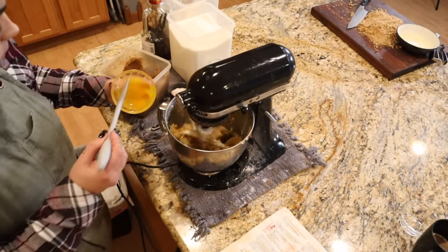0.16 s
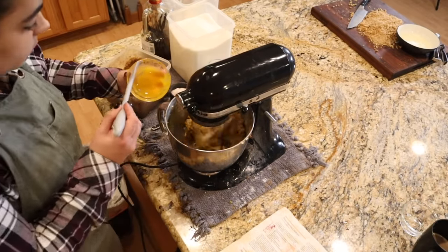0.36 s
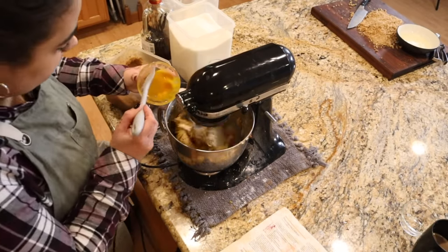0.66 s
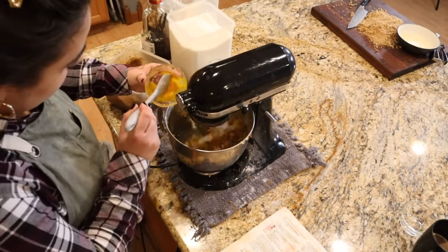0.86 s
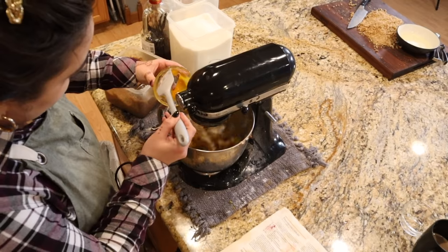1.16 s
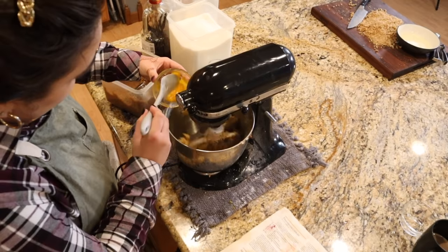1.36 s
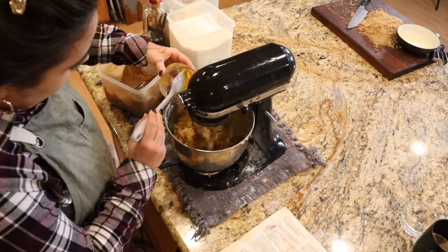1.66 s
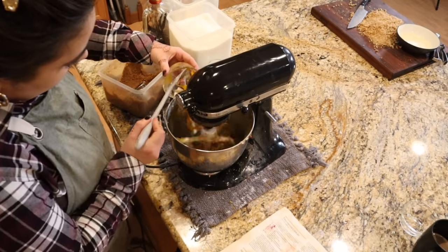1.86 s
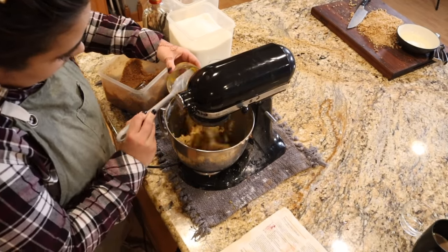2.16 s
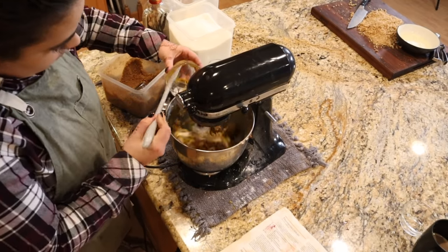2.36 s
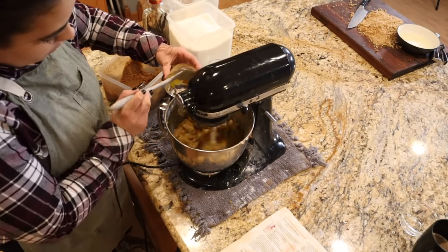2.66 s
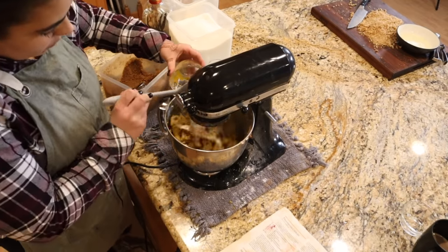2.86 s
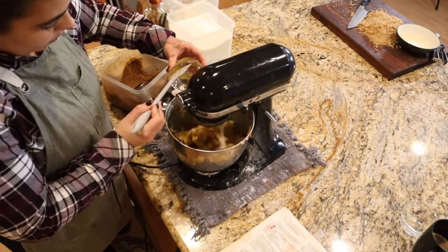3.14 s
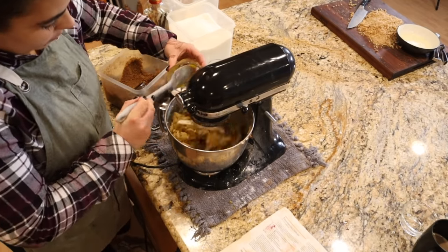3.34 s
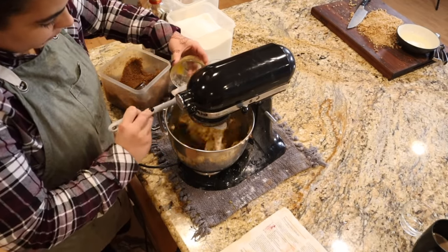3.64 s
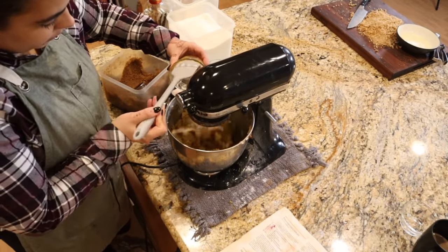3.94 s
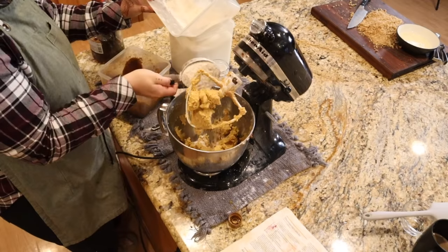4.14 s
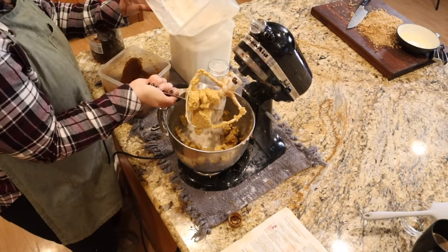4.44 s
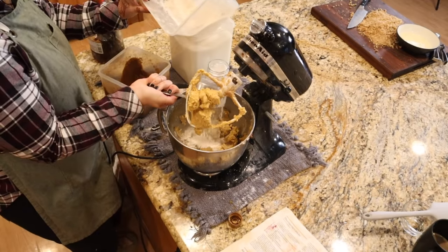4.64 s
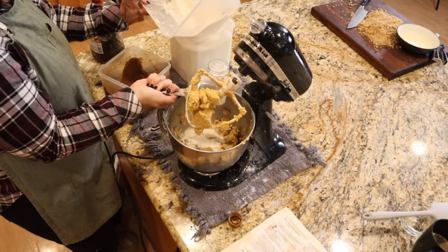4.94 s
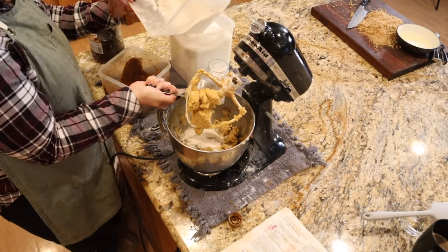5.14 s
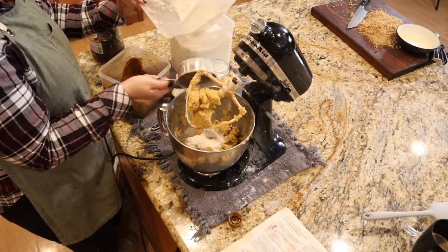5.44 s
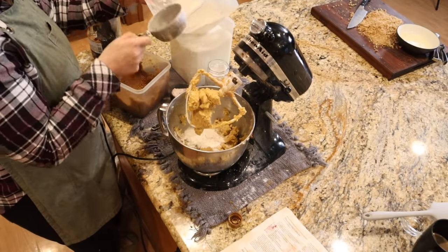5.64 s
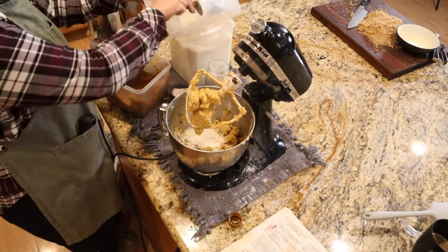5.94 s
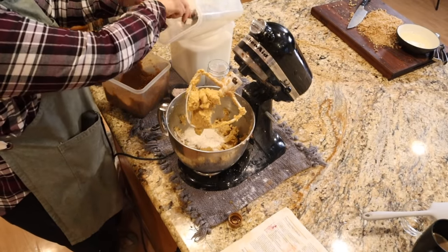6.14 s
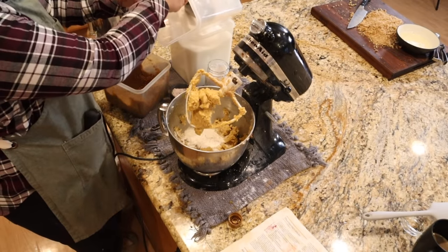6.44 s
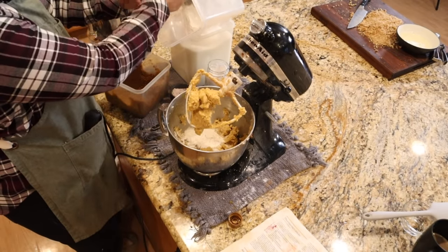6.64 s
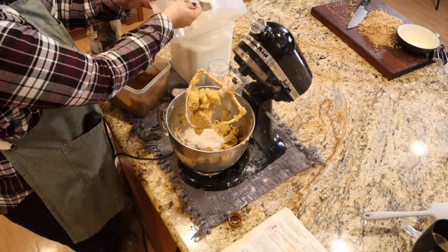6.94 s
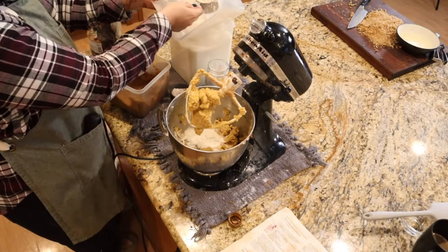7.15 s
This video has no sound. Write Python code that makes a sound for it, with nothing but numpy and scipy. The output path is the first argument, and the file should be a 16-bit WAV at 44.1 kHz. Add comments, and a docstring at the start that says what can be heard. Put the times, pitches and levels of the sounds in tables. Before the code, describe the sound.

Heard from close by, an electric kitchen mixer beats dough with a steady high whine, a hiss and faint gear ticks, joined by occasional utensil clacks on its metal bowl. After about four seconds the motor sound breaks off, leaving faint room hiss. Soft scooping follows, with dull bumps of a plastic tub, a few louder knocks from a metal measuring cup and some light clinks, each with a short room echo.

```python
"""Stand mixer and measuring cup

A stand mixer beats dough on a kitchen counter: its commutator whines at a pitch that sags under load,
the gears churn and tick, and a spatula and dish excite the modes of the steel bowl. The mixer's sound
breaks off. In the quiet room a metal measuring cup serves as a scoop: it clinks, knocks on plastic
rims and bumps the flour tub. Each impact rings object and room; soft rubs and thuds come in between."""
import sys
import numpy as np
from scipy import signal
from scipy.fft import rfft, irfft
from scipy.io import wavfile
from scipy.ndimage import uniform_filter1d

SR = 44100
rng = np.random.default_rng(int(sys.argv[2]) if len(sys.argv) > 2 else 0)


def unload_wav(signal):
    """Save mono or channel-first audio to the path in sys.argv[1] as 16-bit WAV at rate SR, clipped to [-1, 1]."""
    wavfile.write(
        sys.argv[1],
        SR,
        np.round(np.clip(np.atleast_2d(signal).T, -1, 1) * 32767).astype(np.int16),
    )


N = 321930
TIME = np.arange(N) / SR
RING = np.arange(int(.7 * SR)) / SR  # time axis of one short event [s]
MIXER_END_S = 4.168
COMMUTATOR_BARS, RIPPLE_HZ = 16, 120
HOUSING_HZ, HOUSING_WIDTH_HZ = 1859, 38  # resonance of the motor housing
PORT_LAG_SAMPLES = 2

# motor shaft, held back unevenly by the dough: (time [s], speed [Hz])
SHAFT_SPEED = [(0.0, 116.9), (0.15, 117.8), (0.29, 115.6), (0.54, 118.1), (0.75, 116.0), (0.88, 116.7),
               (0.93, 115.1), (1.02, 116.2), (1.07, 118.3), (1.14, 118.2), (1.21, 116.2), (1.25, 117.5),
               (1.36, 115), (1.45, 117.9), (1.56, 116.6), (1.64, 117), (1.79, 115.7), (1.91, 117.5),
               (1.94, 114.5), (2.0, 117), (2.12, 116.4), (2.23, 118.1), (2.29, 116.6), (2.34, 118.1),
               (2.4, 116.3), (2.53, 116.9), (2.58, 117.9), (2.72, 117), (2.86, 117.1), (2.97, 114.9),
               (3.13, 118), (3.24, 115.9), (3.34, 118.1), (3.53, 115.5), (3.65, 116.9), (3.82, 116.1),
               (3.87, 117.6), (3.95, 116.1), (4.04, 117.2), (4.15, 115.4)]
# envelope of the whine, which dips briefly once: (time [s], level [dB])
WHINE_LEVEL = [(0, -42), (1.06, -45.5), (1.11, -47), (1.16, -45), (4.15, -46)]
# whine partials: (offset [shaft orders], offset [ripple orders], level [dB], gain with sag [dB/Hz])
WHINE_PARTIALS = [(0, -2, -22.5, -4), (0, -1, -18.5, -5), (0, 0, -1.5, -1), (0, 1, -11.5, 6),
                  (1, 0, -20.5, -3), (0, 2, -16.5, 2)]
# hum of the gear train: (frequency at the usual shaft speed [Hz], level [dB])
GEAR_TONES = [(435, -63), (505, -66), (655, -64.5), (768, -63.5), (848, -61)]
# clicks of the gear case, on a beat of about twenty shaft turns: (time [s], level [dB])
GEAR_TICKS = [(0.2324, -50.5), (0.571, -47.5), (0.743, -48.5), (0.913, -50.5), (1.256, -50), (1.768, -49.5),
              (2.1115, -52.5), (2.280, -48), (2.449, -50.5), (2.790, -49), (2.962, -49.5), (3.474, -49.5),
              (3.645, -46.5), (3.987, -49)]
# spectra of gear churn, brushes with cooling air, and a tick: (frequency [Hz], relative level [dB])
CHURN_SPECTRUM = [(30, -56), (65, -7), (100, -13.5), (130, -13.5), (200, -23.5), (248, -3), (290, -17),
                  (385, -9), (455, -5.5), (600, -11.5), (670, -2), (850, -8.5), (915, -10.5), (1060, -5.5),
                  (1400, -15), (2000, -4.5), (3200, -100)]
BRUSH_SPECTRUM = [(1000, -4), (2200, 7), (2650, 4), (3100, 3), (4800, 7.5), (5600, 7), (6600, 12),
                  (7800, 5), (8700, 6.5), (10000, 0), (12000, -3), (15500, -19)]
TICK_SPECTRUM = [(1200, -17.5), (3000, -10), (5000, -1), (8500, -10.5), (12000, -18), (16000, -44)]

# impacts: (time [s], thump [dB], knock [dB], click [dB], frequency the struck spot favours [Hz],
# gain of that added band [dB], free ring relative to the rattle [dB])
BOWL_CLACKS = [(0.301, -49, -50, -45, 484, 5, -22), (1.6267, -66, -40, -39.5, 4540, -4, -3),
               (1.9357, -49.5, -35.5, -31, 5360, -1, -4), (1.949, -51, -35, -44, 1000, 7, -3),
               (2.3616, -55.5, -41, -56, 940, 12, -14), (2.6284, -54, -36, -41.5, 980, 12, 2),
               (3.5374, -52, -33.5, -35, 2170, 6, -6), (3.549, -66, -35.5, -42, 1020, 9, 11)]  # clacks of spatula and dish on the bowl, two followed by a quick echo
SCOOP_BLOWS = [(5.1593, -54.5, -47.5, -56.5, 1340, -11, -16), (5.316, -34.5, -37, -41.5, 760, 10, -14),
               (6.0301, -20, -18.5, -35, 1010, -1, -11), (6.0625, -24.5, -25.5, -29.5, 955, -1, -21),
               (6.0645, -44, -30, -34.5, 6950, -18, -22), (6.1915, -29, -34.5, -44.5, 1000, 0, -4)]  # scoop on plastic rims
TUB_BLOWS = [(4.7037, -64, -52, -64, 484, 4, -10), (4.8229, -67, -51, -60, 500, 3, 3),
             (5.3505, -37.5, -42.5, -56, 232, 11, -5), (5.409, -32, -40, -64, 346, 6, -0.5),
             (5.555, -38.5, -38, -57.5, 760, 2, -7), (6.2288, -15.5, -31.5, -41.5, 151, -6, 1.5),
             (6.5923, -43.5, -56, -56, 186, 22, -7), (6.7165, -36.5, -55, -53, 170, 32, -2.5),
             (6.9395, -44, -56, -73, 380, -10, 10), (7.1708, -32.5, -46, -87, 328, 8, 4)]  # tub on the counter
CUP_BLOWS = [(6.4681, -56, -64, -53.5, 4370, -3, -23), (6.4772, -52, -53, -54, 4430, 9, -20),
             (6.5251, -59, -40, -35.5, 3840, 9, -10), (6.5702, -45, -44, -52, 1320, -11, -25),
             (6.8, -51.5, -57, -56, 1310, 12, -8), (6.8574, -62, -51, -51, 1300, -2, -13),
             (6.8708, -50, -33, -52, 1220, 3, -11)]  # clinks of the measuring cup
# normal modes of each object: (frequency [Hz], relative level [dB], t60 [s])
BOWL_MODES = [(350, -20, 0.17), (996, -1, 0.17), (1074, -1, 0.11), (1417, -6, 0.14), (1742, -7, 0.25),
              (2036, 1, 0.044), (2593, -5, 0.084), (3370, -8, 0.18), (4750, 1.5, 0.13), (4870, -4, 0.15),
              (5290, 3, 0.06)]
SCOOP_MODES = [(164, 11, 0.12), (392.5, -2.5, 0.17), (820, -10, 0.11), (930, -13, 0.074), (966, 2, 0.083),
               (1060, -13, 0.047), (1320, -8, 0.11), (1477, 1, 0.14)]
TUB_MODES = [(137, -8, 0.11), (164, 6, 0.11), (260, -10.5, 0.34), (323, -3.5, 0.16), (381, -0.5, 0.089),
             (413, 7.5, 0.077), (452, 3.5, 0.035)]
CUP_MODES = [(1080, 4, 0.13), (1194, -10, 0.11), (1353, -3, .12), (1384, 6, 0.15)]
# dense rattle between the modes: (frequency [Hz], relative level [dB])
BOWL_RATTLE = [(100, -36), (230, 4), (380, 19), (550, -4), (950, 1.5), (2000, -3), (3500, 0.5),
               (5200, -2.5), (8500, 3.5), (11000, -18), (16000, -28)]
SCOOP_RATTLE = [(30, -54), (90, -29), (155, 2), (240, -5), (380, 5.5), (560, -7.5), (720, -4.5), (1000, -2),
                (1500, -4), (2000, -10.5), (4000, -9.5), (6000, -16.5), (8500, -17.5), (11000, -25.5),
                (16000, -34)]
TUB_RATTLE = [(25, -43), (55, -24), (90, -8), (125, -5), (160, 2), (215, -3.5), (280, -2.5), (400, 4),
              (560, -4.5), (680, -7), (950, -7.5), (1400, -14.5), (2700, -28.5), (6000, -36), (11000, -44),
              (16000, -50)]
CUP_RATTLE = [(30, -21), (90, 6), (220, 6), (420, 8), (720, -8.5), (1100, 6), (1400, 1), (1900, -7.5),
              (3800, -21), (6000, -26.5), (10000, -28), (16000, -41)]
# soft noisy swells: rubs and scooping, dull thuds, low rumble and the tub's lingering ring:
# (peak time [s], length [s], centre [Hz], width [octaves], body [dB], rumble [dB], hiss [dB])
SOFT_SWELLS = [(0.081, 0.14, 573, 1.6, -44, -64, -43.5), (0.329, .15, 480, 1.8, -32.5, -39.5, -38),
               (0.635, 0.047, 100, .6, -47, -52, -70), (0.701, 0.2, 460, 1.6, -43, -50.5, -51.5),
               (1.494, 0.0498, 433, 0.33, -41, -66, -64), (2.637, 0.079, 3000, .8, -43, -58, -43),
               (3.476, 0.17, 236, 0.15, -49.5, -68, -66), (4.055, 0.095, 460, 0.99, -49, -74, -66),
               (4.581, 0.25, 469, 0.16, -47.5, -80, -77), (4.62, 0.31, 1180, 0.68, -59, -70, -74),
               (4.772, 0.28, 806, 1.2, -60, -52.5, -64), (5.438, 0.093, 332, 1.4, -43.5, -41, -66),
               (5.581, .1, 400, 1.1, -43, -42.5, -68), (6.375, .16, 353, 0.16, -39, -70, -59),
               (6.84, 0.17, 1260, 0.65, -49.5, -66, -49)]

# spectra of the quiet kitchen and of the reverberation: (frequency [Hz], relative level [dB])
KITCHEN_SPECTRUM = [(20, 3), (60, -4.5), (130, -5), (300, -7), (600, -10), (1200, -13), (3000, -18.5),
                    (8000, -21.5), (15500, -24)]
ROOM_SPECTRUM = [(150, -3.5), (400, -0.5), (900, -1), (5000, -0.5)]
# reverberation time: (frequency [Hz], t60 [s])
ROOM_T60 = [(100, 0.44), (400, 0.35), (1500, 0.63), (5000, 0.41), (14000, 0.03)]


def motor_whine(flutter_db=1.4, pulse_db=0.8, scatter_db=-19, hum_db=-69, waver_hz=0.13):
    """Modulation: mains ripple and shaft wobble put sidebands around the commutator's tone."""
    speed = shaft_speed() + waver_hz * walk(35.05)
    turns = np.cumsum(speed) / SR
    sag_hz = np.mean(np.transpose(SHAFT_SPEED)[1]) - shaft_speed()
    level_db = np.interp(TIME, *np.transpose(WHINE_LEVEL))
    mistuning = 2 * (COMMUTATOR_BARS * speed - HOUSING_HZ) / HOUSING_WIDTH_HZ
    housing_db = -10 * np.log10(1 + mistuning ** 4)
    out = 0
    for shaft, ripple, partial_db, db_per_hz in WHINE_PARTIALS:
        cycles = (COMMUTATOR_BARS + shaft) * turns + ripple * RIPPLE_HZ * TIME
        tone = np.exp(2j * np.pi * cycles)
        if shaft == ripple == 0:  # the main tone fades as it leaves the housing's resonance
            swell_db = housing_db + pulse_db * walk(25.05)
        else:
            swell_db = flutter_db * walk(6.9)
        scattered = np.array([np.real(tone * (walk(40.05) + 1j * walk(40))) for _ in range(2)])
        gain = np.sqrt(2) * undb(level_db + partial_db + db_per_hz * sag_hz + swell_db)
        out = out + gain * (ports(tone.real) + undb(scatter_db) * scattered)
    mains_hum = undb(hum_db) * np.sqrt(2) * np.sin(2 * np.pi * RIPPLE_HZ * TIME)
    return out + mains_hum


def shaft_speed():
    """Rotation rate of the motor in Hz, varying with the load of the dough."""
    return np.interp(TIME, *np.transpose(SHAFT_SPEED))


def gears_and_brushes(churn_db=-50, brush_db=-47, grain_db=2, ribs_db=2):
    """Resonant filtering: the housing's many narrow modes rib the noise of gears and brushes."""
    churn = noise_field(CHURN_SPECTRUM, direct=0.51) * undb(churn_db + grain_db * walk(150))
    brushes = noise_field(BRUSH_SPECTRUM, direct=0.7) * undb(brush_db + .5 * walk(6.9) + .27 * walk(700))
    f, rib_hz = bins(N), np.linspace(0, SR / 2, 600)
    ribs = np.interp(f, rib_hz, rng.standard_normal(len(rib_hz)))
    housing = undb(ribs_db * ribs * np.minimum(f / 1500, 1))
    return irfft(rfft(churn * pan(db=-3) + brushes * pan(db=0.5)) * housing, N)


def gear_hum(flutter_db=3):
    """Periodic tooth meshing gives tones proportional to shaft speed, each fluttering on its own."""
    shaft_time = np.cumsum(shaft_speed() / np.mean(shaft_speed())) / SR
    hum = 0
    for hz, db in GEAR_TONES:
        gain = np.sqrt(2) * undb(db + flutter_db * walk(25.01))
        hum = hum + gain * np.sin(2 * np.pi * hz * shaft_time + 1.23 * walk(35))
    return ports(hum)


def gear_ticks(chatter_db=16, chatter_s=0.0057, wet_db=-6):
    """Impulse response: brief contacts, filtered by gear case and room, are heard as scratchy clicks."""
    out = np.zeros((2, N))
    paths = ports(impulse()) + room(wet_db)
    response = signal.fftconvolve([minimum_phase(TICK_SPECTRUM)], paths)
    for s, db in GEAR_TICKS:
        click = convolve([contact(chatter_db, chatter_s)], response)
        add(out, s, click * undb(db) / click[:, :SR // 20].std())
    return out


def impacts(blows, modes, rattle, chatter_db, chatter_s, wet_db, loading_db):
    """Impact excitation: each blow rings object and room, with a spectrum set by where it lands."""
    out, walls, body = np.zeros((2, N)), room(wet_db), minimum_phase(rattle)
    for s, *levels_db, spot_hz, spot_db, ring_db in blows:
        ring = free_ring(modes, loading_db)
        # the direct path carries the chatter; the walls average all directions into one smooth crack
        cracks = convolve([contact(chatter_db, chatter_s), impulse()], [body])
        vibration = cracks / cracks.std(axis=1, keepdims=True) + undb(ring_db) * ring
        radiated = crossover(vibration, 110, "high")  # small objects radiate almost no deep bass
        spot_band = signal.lfilter(*signal.iirpeak(spot_hz, Q=4, fs=SR), radiated)
        direct, to_walls = radiated + undb(spot_db) * spot_band
        heard = ports(direct) + convolve([to_walls], walls)
        add(out, s, balance_bands(heard, levels_db))
    return out


def free_ring(modes, loading_db, detune=0.0067):
    """Free vibration is a sum of damped modes; a hand or the dough loads them anew at every blow."""
    shifts_db = loading_db * rng.standard_normal(len(modes))
    tunings = 1 + detune * rng.standard_normal(len(modes))
    return unit(sum(undb(db + shift_db) * np.sin(2 * np.pi * hz * tuning * RING) * decay(t60)
                    for (hz, db, t60), shift_db, tuning in zip(modes, shifts_db, tunings)))


def contact(chatter_db, chatter_s):
    """Contact force: one sharp push, then a brief chatter of the touching surfaces."""
    chatter = rng.standard_normal(len(RING)) * np.exp(-RING / chatter_s)
    return impulse() + undb(chatter_db) * chatter / np.linalg.norm(chatter)


def balance_bands(blow, levels_db, low_hz=600, high_hz=2300, attack_s=0.03):
    """Band splitting: thump, knock and click each get their own rms level over the attack."""
    thump, upper = crossover(blow, low_hz, "low"), crossover(blow, low_hz, "high")
    knock, click = crossover(upper, high_hz, "low"), crossover(upper, high_hz, "high")
    return sum(band * undb(db) / band[:, :int(attack_s * SR)].std()
               for band, db in zip((thump, knock, click), levels_db))


def soft_swells(grain_db=1.7, rise_share=0.28, fade_share=0.47):
    """Enveloped noise bands: rubs and scooping, dull thuds, low rumble and the tub's lingering ring."""
    out, grain = np.zeros((2, N)), undb(grain_db * walk(300))
    for peak_s, length_s, hz, octaves, body_db, rumble_db, hiss_db in SOFT_SWELLS:
        body = undb(body_db) * noise_band(hz, octaves)
        rumble = undb(rumble_db) * noise_band(hz=78, octaves=0.9)
        hiss = undb(hiss_db) * noise_band(hz=4400, octaves=0.8)
        rise_s = length_s * rise_share
        envelope = np.minimum(RING / rise_s, np.exp((rise_s - RING) / (fade_share * length_s)))
        add(out, max(peak_s - rise_s, 0), (body + rumble + hiss) * envelope)
    return out * unit(grain)


def noise_band(hz, octaves, dull_hz=8500):
    """Random forcing of one resonance gives a band of noise around its centre."""
    f = bins(len(RING))
    resonance = (1 + (np.log2((f + 1) / hz) / octaves) ** 2 / 2) ** -2.2
    colour = resonance / (1 + (f / dull_hz) ** 4)
    return unit(irfft(diffuse(len(RING)) * colour, len(RING)))


def room(wet_db, build_s=0.0083, echo_s=0.014, echo_db=-2):
    """Reverberation: early reflections, then a tail whose half-octave bands decay at their own rates."""
    f, tail = bins(len(RING)), 0
    field = diffuse(len(RING)) * undb(along(ROOM_SPECTRUM, f))
    for hz in 45 * 2 ** (np.arange(18) / 2):
        band = irfft(field * ((f >= hz) & (f < hz * np.sqrt(2))), len(RING))
        tail = tail + band * decay(along(ROOM_T60, hz))
    build_up = 1 - np.exp(-(RING / build_s) ** 2)
    early = undb(echo_db) * np.exp(-(2 * (RING - echo_s) / build_s) ** 2)  # ceiling and cupboards
    return undb(wet_db) * unit(tail * (build_up + early)) / np.sqrt(len(RING))


def kitchen_noise(level_db=-52):
    """Noise floor: the faint, almost wholly diffuse hiss of the quiet room and the microphone."""
    return noise_field(KITCHEN_SPECTRUM, direct=0.014) * undb(level_db + 0.56 * walk(12))


def noise_field(spectrum, direct):
    """Incoherent fields add in power: steady noise arrives as a direct share and a diffuse remainder."""
    field = np.sqrt(direct) * rfft(ports(rng.standard_normal(N))) + np.sqrt(1 - direct) * diffuse(N)
    return unit(irfft(field * undb(along(spectrum, bins(N))), N))


def diffuse(size, coherent_hz=650):
    """Spectra of a diffuse field: the two ports receive coherent bass and unrelated treble."""
    mid, side = rfft(rng.standard_normal((2, size)))
    side_share = .5 * bins(size) / (bins(size) + coherent_hz)
    return mid * np.sqrt(1 - side_share) + side * np.sqrt(side_share) * np.array([[1], [-1]])


def ports(x):
    """Path difference: sound from the counter reaches the left microphone port before the right."""
    return np.array([x, np.pad(x, (PORT_LAG_SAMPLES, 0))[:len(x)]])


def pan(db):
    """Channel gains for a left-minus-right level difference."""
    return undb(db * np.array([[.5], [-.5]]))


def minimum_phase(spectrum, size=2048):
    """Folding the cepstrum gives the most compact causal response with a given magnitude spectrum."""
    cepstrum = irfft(np.log(undb(along(spectrum, bins(size)))))
    cepstrum[1:size // 2] *= 2
    cepstrum[size // 2 + 1:] = 0
    return irfft(np.exp(rfft(cepstrum)))


def crossover(x, hz, kind):
    """One of two complementary filters whose outputs sum to a flat magnitude."""
    sos = signal.butter(2, hz, kind, fs=SR, output="sos")
    return signal.sosfilt(sos, signal.sosfilt(sos, x))


def walk(rate_hz):
    """Slow random modulation: held values, smoothed twice, at rms 1."""
    hold = int(SR / rate_hz)
    steps = np.repeat(rng.standard_normal(N // hold + 1), hold)
    return unit(uniform_filter1d(uniform_filter1d(steps, hold), hold)[:N])


def impulse():
    """A unit impulse at the start of an event."""
    return 1. * (RING == 0)


def decay(t60):
    """Exponential damping by 60 dB in t60 seconds."""
    return np.exp(-np.log(1000) * RING / t60)


def convolve(x, response):
    """Linear filtering, cut to the length of one event."""
    return signal.fftconvolve(x, response)[:, :len(RING)]


def add(out, s, sound):
    """Superpose a stereo sound at time s."""
    start = int(s * SR)
    out[:, start:start + sound.shape[1]] += sound[:, :N - start]


def along(points, hz):
    """Interpolate (frequency [Hz], value) points on a logarithmic frequency axis."""
    f, value = np.transpose(points)
    return np.interp(np.log(hz + 1), np.log(f), value)


def bins(size):
    """Frequencies in the spectrum of size samples."""
    return np.fft.rfftfreq(size, 1 / SR)


def undb(db):
    """Decibels to amplitude ratio."""
    return 10 ** (np.asarray(db) / 20)


def unit(x):
    """Normalise to rms 1."""
    return x / np.sqrt(np.mean(x ** 2))


def scene():
    """Superposition: the running mixer, then the quiet kitchen with scoop, cup and tub."""
    bowl = impacts(BOWL_CLACKS, BOWL_MODES, BOWL_RATTLE,
                   chatter_db=6.5, chatter_s=0.01, wet_db=-6, loading_db=-1)
    scoop = impacts(SCOOP_BLOWS, SCOOP_MODES, SCOOP_RATTLE,
                    chatter_db=3, chatter_s=0.0033, wet_db=-5.5, loading_db=0.5)
    tub = impacts(TUB_BLOWS, TUB_MODES, TUB_RATTLE,
                  chatter_db=6.5, chatter_s=0.004, wet_db=-6.5, loading_db=3.2)
    cup = impacts(CUP_BLOWS, CUP_MODES, CUP_RATTLE,
                  chatter_db=1.5, chatter_s=0.0039, wet_db=-6.5, loading_db=7)
    kitchen = kitchen_noise()
    mixer = motor_whine() * pan(db=2.5) + gears_and_brushes() + gear_hum() + gear_ticks() + bowl
    running = np.clip((MIXER_END_S - TIME) / 0.0064 + .5, 0, 1)
    return running * mixer + (1 - running) * kitchen + scoop + cup + tub * pan(db=-0.8) + soft_swells()


def record(dry, bass_hz=42, top_hz=15850, drive=1.1):
    """Band limiting and soft saturation: the deepest bass thins, peaks round off, the top is cut."""
    thinned = signal.sosfilt(signal.butter(3, bass_hz, "high", fs=SR, output="sos"), dry)
    rounded = np.tanh(drive * thinned) / drive
    return signal.sosfilt(signal.ellip(10, .1, 70, top_hz, fs=SR, output="sos"), rounded)


dry = scene()
out = record(dry)
unload_wav(out)
```